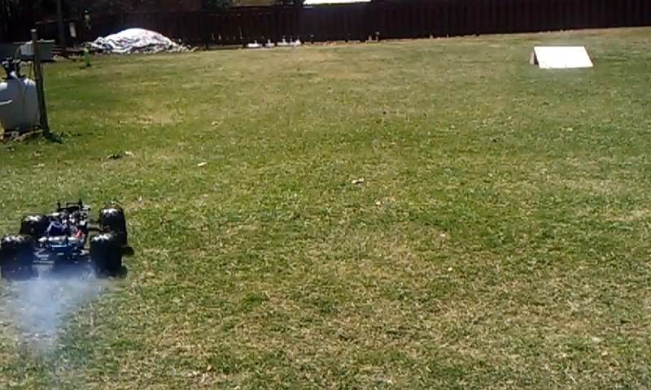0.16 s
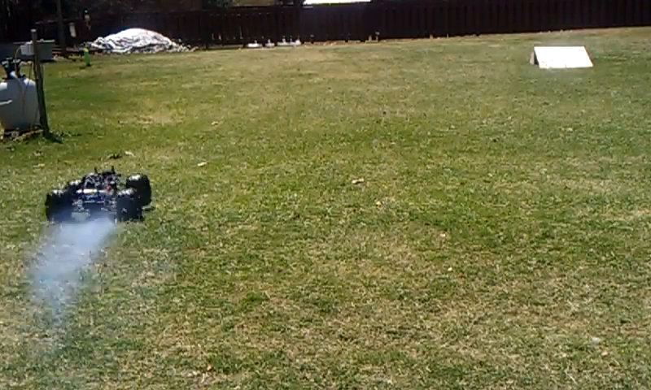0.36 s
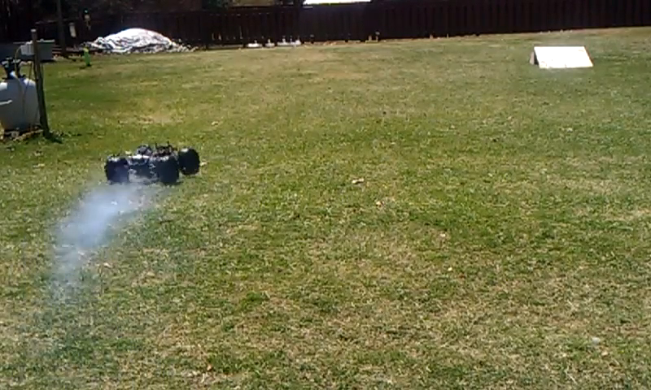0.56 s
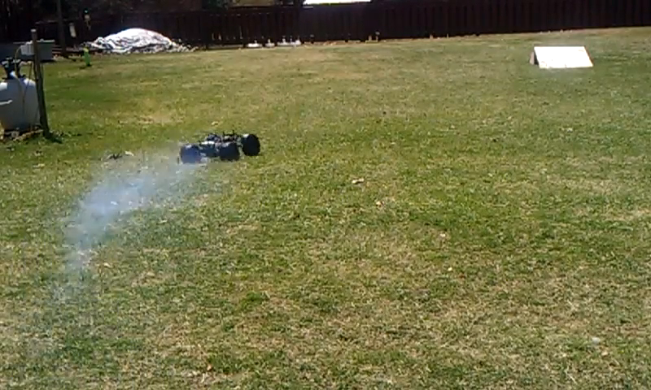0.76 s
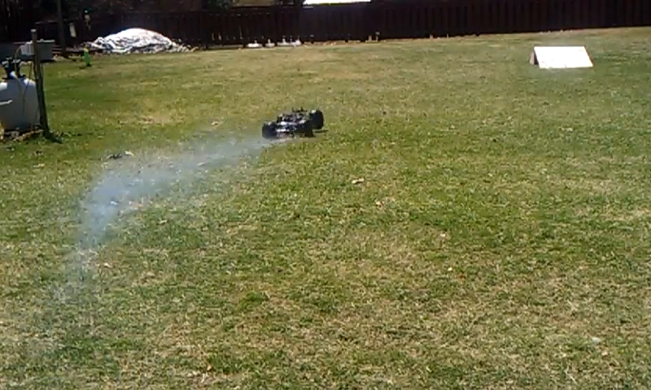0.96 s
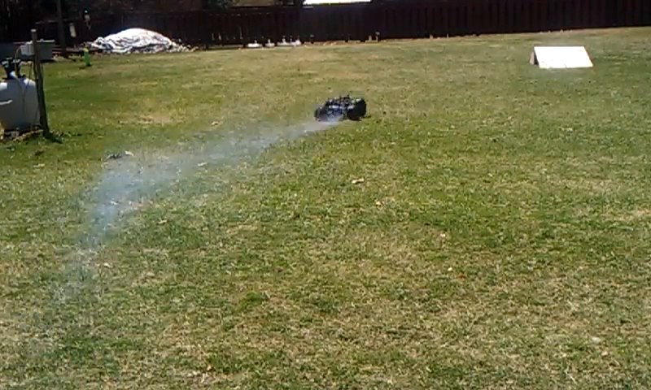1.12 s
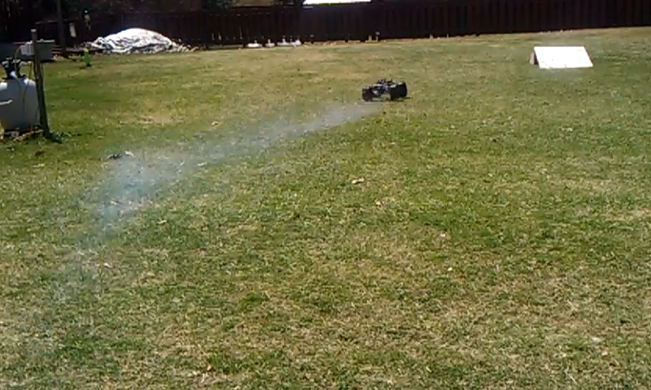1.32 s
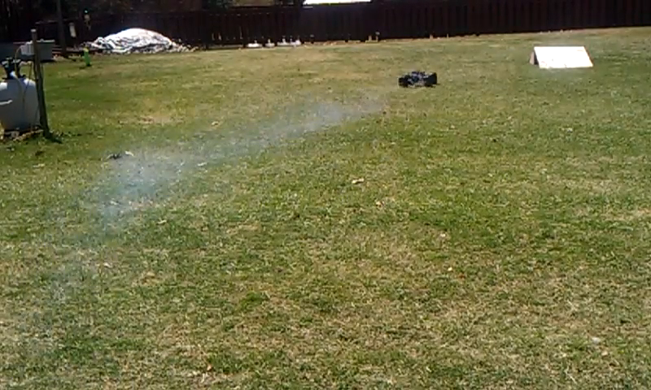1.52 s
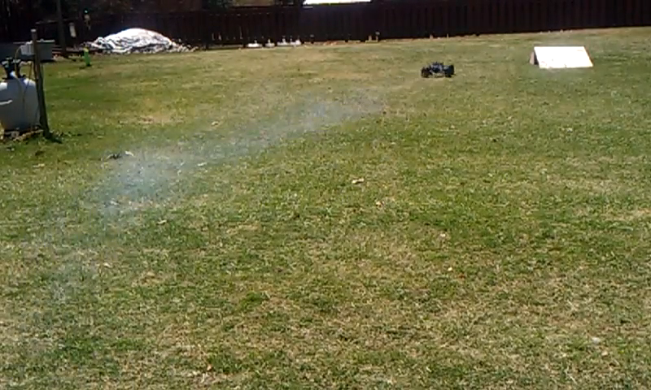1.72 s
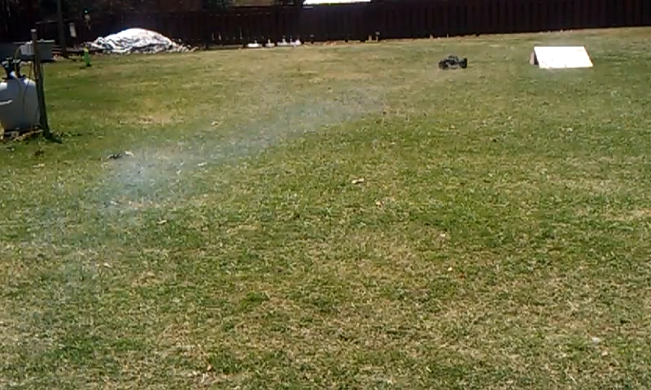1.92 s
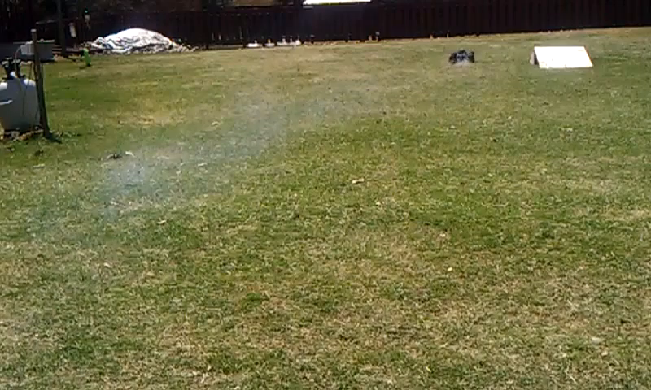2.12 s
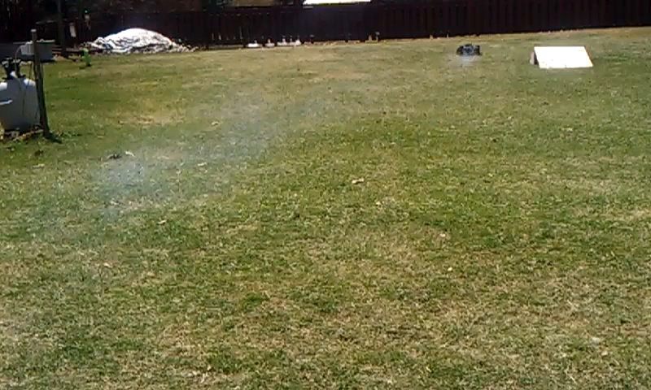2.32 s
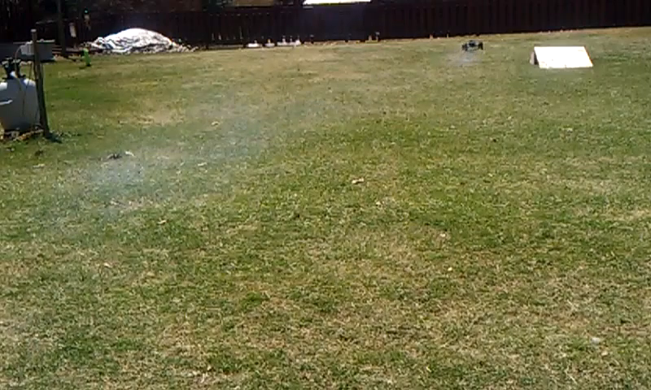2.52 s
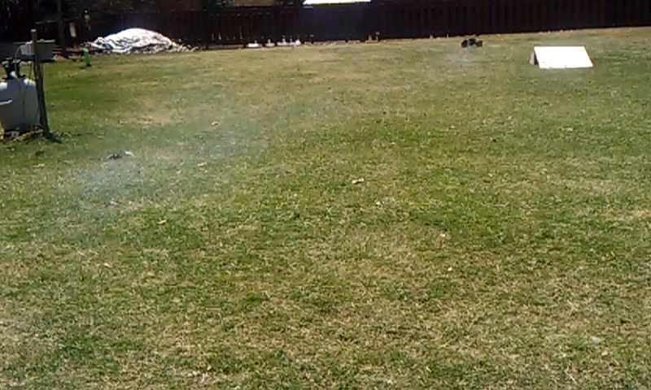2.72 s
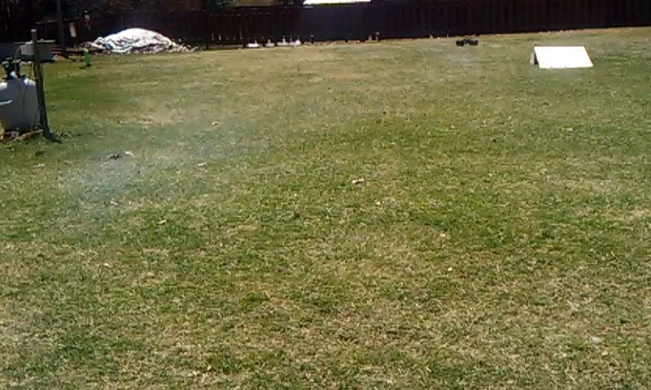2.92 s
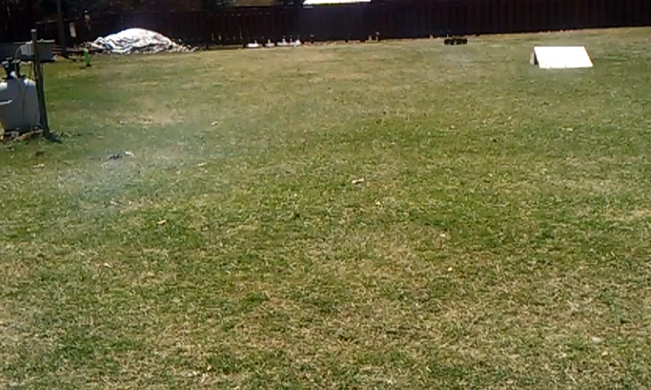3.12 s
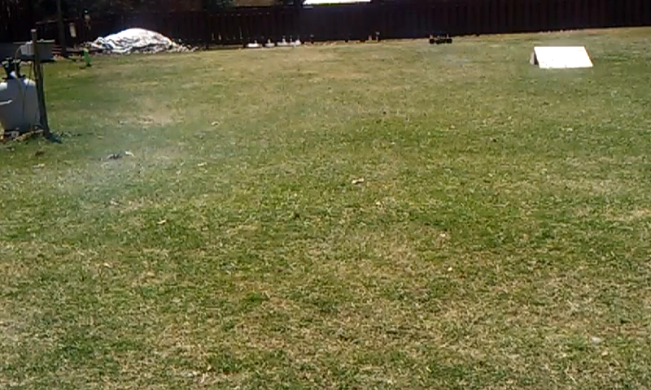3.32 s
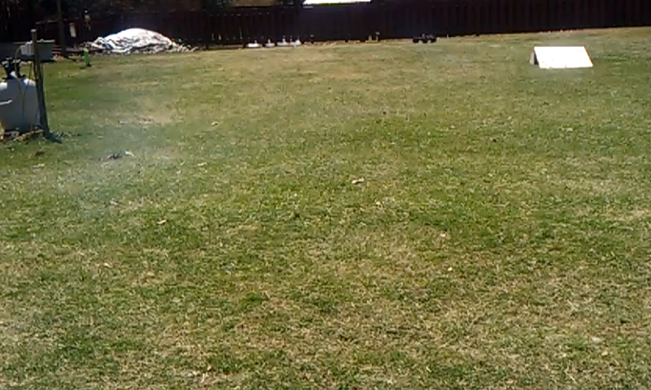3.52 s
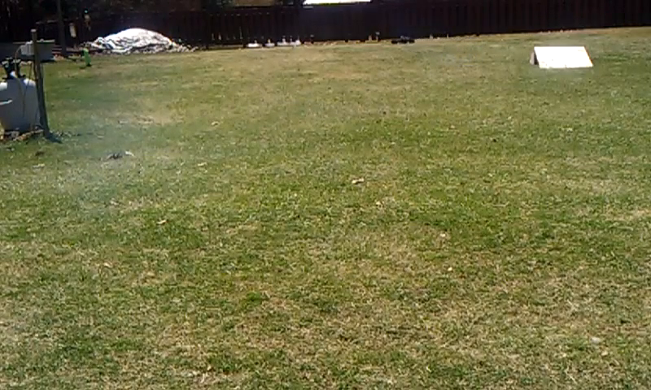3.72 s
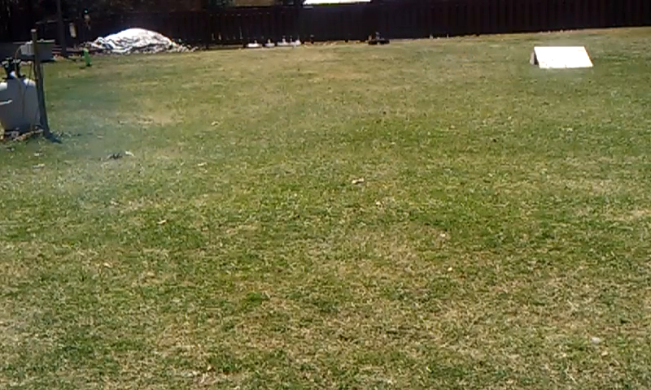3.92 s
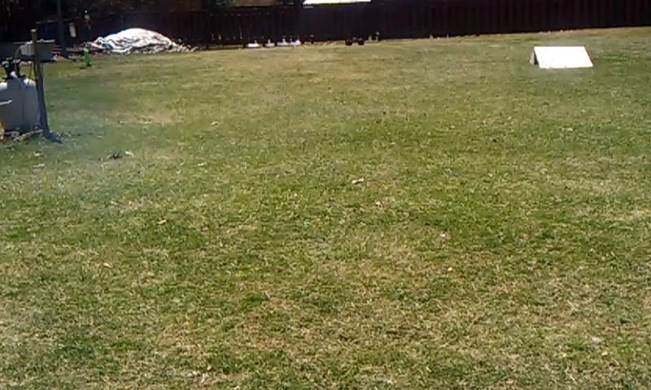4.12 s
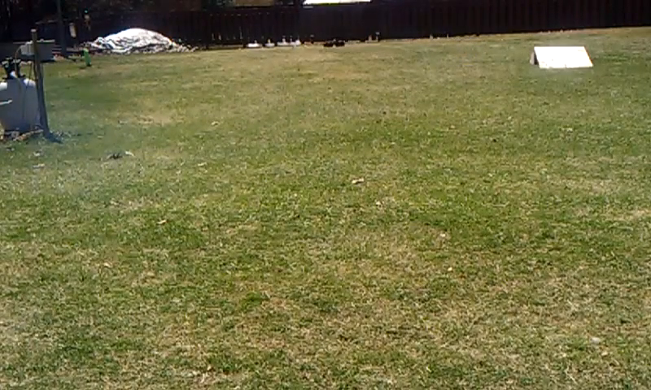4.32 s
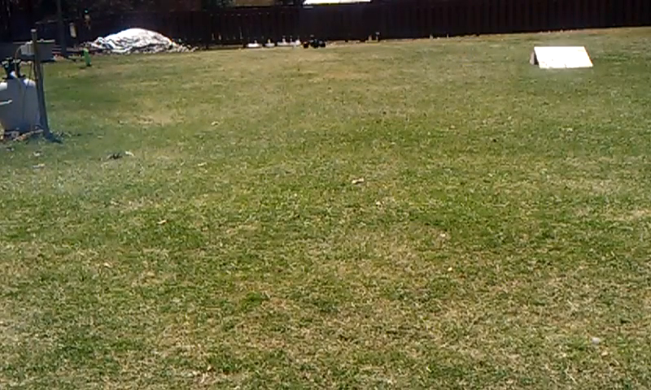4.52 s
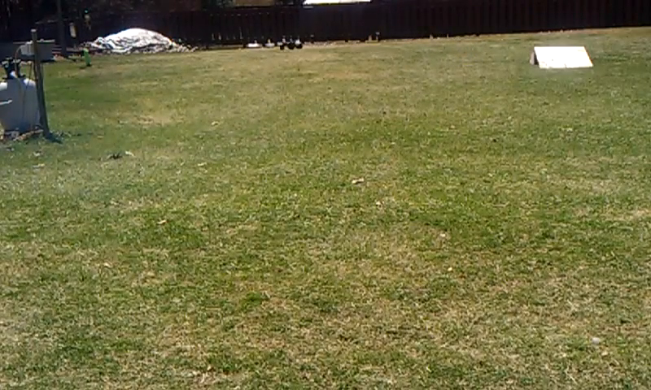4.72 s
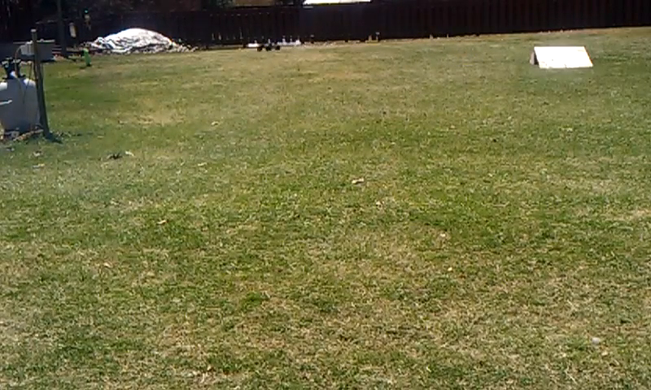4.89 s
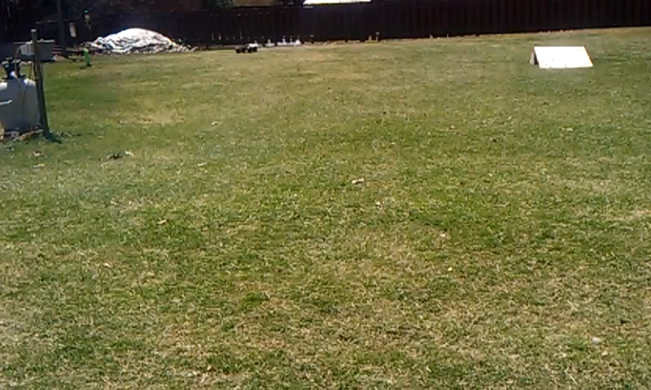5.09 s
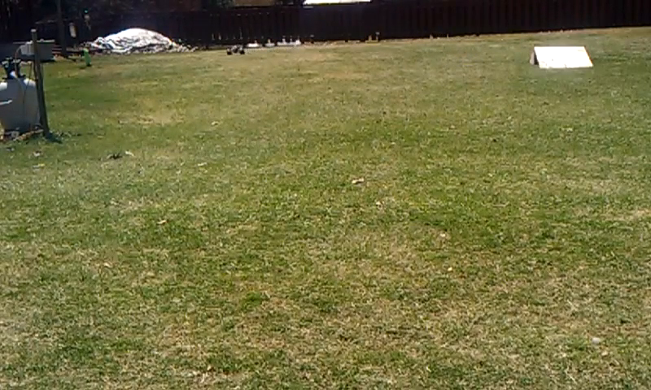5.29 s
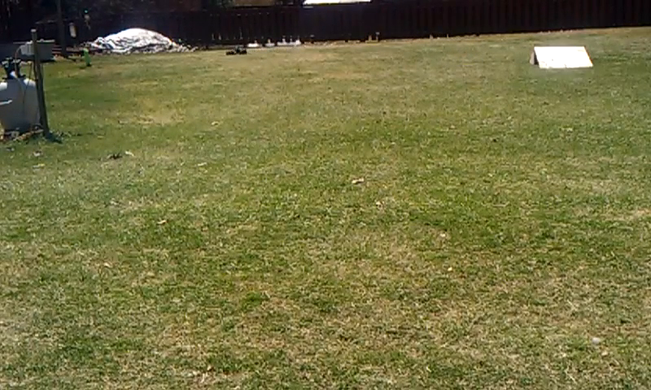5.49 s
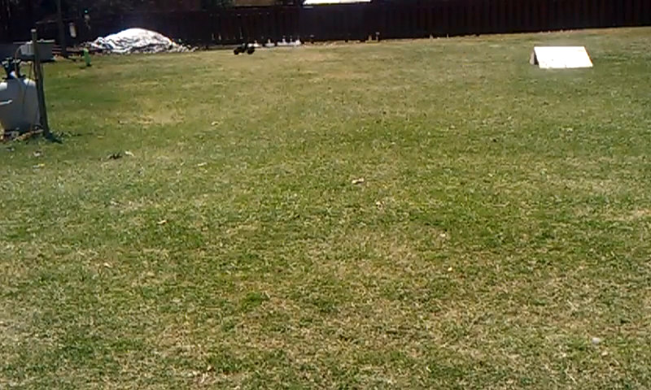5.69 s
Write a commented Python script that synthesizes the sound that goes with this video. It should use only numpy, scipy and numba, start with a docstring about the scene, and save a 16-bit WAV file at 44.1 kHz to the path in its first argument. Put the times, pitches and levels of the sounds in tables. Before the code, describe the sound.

A small two-stroke toy truck engine buzzes loudly away over a lawn in ragged throttle blips, sputters at idle, then revs twice more, faintly.

```python
"""Toy truck with a glow engine

A radio-controlled truck with a small two-stroke engine drives away over a lawn, blips, idles and revs twice more.
Each firing sends a clean pressure pulse and a ragged blast of gas through the tuned pipe; off throttle it sputters.
A fence throws the sound back, more so as the truck gets far.
Soft outdoor air and light wind puffs on the microphone lie behind it."""
import sys
import numpy as np
from scipy import signal
from scipy.fft import rfft, irfft
from scipy.io import wavfile
from scipy.ndimage import uniform_filter1d
from numba import njit

SR = 44100
rng = np.random.default_rng(int(sys.argv[2]) if len(sys.argv) > 2 else 0)


def pcm_store(signal):
    """Save signal as 16-bit PCM."""
    levels = np.round(np.clip(np.atleast_2d(signal), -1, 1) * 32767)
    wavfile.write(sys.argv[1], SR, levels.astype(np.int16).T)


N = 253565
T = np.arange(N) / SR  # time of every sample, s


def engine(metres):
    """Firing tone, low buzz, pipe ring, rasp and idle whine, all locked to the crankshaft."""
    hz, throttle, push_db, pipe_db = drive()
    state = hz, 1 - throttle, push_db, metres
    # the firing rate trembles slightly
    turns = np.cumsum(hz * (1 + .005 * walk(80))) / SR
    pulses = firings(turns, throttle, jitter_s=.000006, idle_jitter_s=.000025,
                     scatter_db=.45, idle_scatter_db=1.3, skip_db=.4)
    pulses = even(pulses)
    rasp = exhaust_rasp(pulses, throttle, state)
    body = pipe_ring(pulses, state) + low_buzz(pulses, state)
    pipe = bounce(rasp + body * undb(pipe_db), spread_s=.0015, share=.6, rate=34)
    tone = firing_tone(turns, throttle, metres)
    return pipe + bounce(tone, spread_s=.0015, share=.35, rate=34)


# pulls on the throttle: (start [s], end [s], firing rate aimed for [Hz], time constant of the change [s],
# opening [0-1], eased off this long before the end [s], level [dB], extra pipe ring and buzz [dB])
THROTTLE_PULLS = [(0, 0.19, 419, 0.42, .92, 0.49, 2.3, 4),
                  (.209, .277, 333, 0.053, 0.79, 0.0068, -1.4, 1.5),
                  (0.276, 0.558, 396, 0.13, 0.76, 0, -2.9, 1),
                  (0.573, 0.739, 448, 0.14, 0.9, 0.0024, -0.7, .5),
                  (0.744, 1.064, 393, .015, 0.82, 0, -1, 1),
                  (1.063, 1.272, 467, 0.041, 0.86, 0.046, 0.3, 2),
                  (1.335, 1.438, 363, .033, 0.26, 0, -0.5, -2),
                  (2.039, 2.318, 474, 0.071, 0.73, 0.067, 1.26, -1.5),
                  (4.369, 4.933, 430, 0.25, 0.72, 0.071, 0.5, -.5),
                  (5.447, 5.794, 416, 0.11, 0.6, 0, -0.65, 4)]
# firing rate aimed for between pulls, sagging as the engine loads up with fuel: (time [s], rate [Hz])
IDLE_RATE = [(3.3, 187.5), (4.3, 183.2), (5.2, 161.1)]
START_HZ, COAST_S = 322, .098  # firing rate of the rolling truck; time constant of the fall toward idle
# throttle at rest (0-1); time constants of its opening and closing
IDLE_OPENING, OPEN_S, CLOSE_S = 0.036, 0.027, 0.063


def drive():
    """Each pull draws the firing rate toward its aim, up or down; between pulls it falls toward idle."""
    aim, = curves(IDLE_RATE)
    resting = (COAST_S, IDLE_OPENING, CLOSE_S, 0, 0)
    lag, opening, servo, push_db, pipe_db = (np.full(N, float(v)) for v in resting)
    for start, end, aim_hz, rise_s, share, ease_s, db, extra_db in THROTTLE_PULLS:
        pulling = (T >= start) & (T < end)
        pressed = (T >= start) & (T < end - ease_s)
        aim[pulling], lag[pulling] = aim_hz, rise_s
        push_db[pulling], pipe_db[pulling] = db, extra_db
        opening[pressed], servo[pressed] = share, OPEN_S
    hz = follow(aim, lag, float(START_HZ))
    # the throttle starts wide open and is already closing during the first pull
    throttle = np.clip(follow(opening, servo, opening.max()), 0, 1)
    return hz, throttle, follow(push_db, servo, 0.), follow(pipe_db, servo, 0.)


def firings(turns, throttle, jitter_s, idle_jitter_s, scatter_db, idle_scatter_db, skip_db):
    """One pulse a turn; a starved engine fires at less regular times and strengths, and turns alternate in strength."""
    at = np.interp(np.arange(1, int(turns[-1])), turns, np.arange(N))
    index = at.astype(int)
    starved = 1 - throttle[index]
    late, strong = np.clip(rng.standard_normal((len(at), 2)), -2, 2).T
    alternate = (-1) ** np.arange(len(at)) * walk(10)[index]
    sizes = undb(strong * (scatter_db + idle_scatter_db * starved) + skip_db * alternate)
    delay_s = late * (jitter_s + idle_jitter_s * starved)
    return clicks(at + SR * delay_s, sizes)


def gas(pulses, decay_s):
    """A burst of turbulence follows every pulse and dies away."""
    push = signal.lfilter([1], [1, -np.exp(-1 / (decay_s * SR))], pulses)
    return even(push * rng.standard_normal(N))


# colour of the rasp on throttle: (frequency [Hz], relative level [dB])
RASP_COLOUR = [(600, -59), (1500, -57.5), (2500, -50.5), (3000, -11.5), (3450, -9), (4100, -10.5),
               (5100, -12), (5900, 1.5), (6450, 2.5), (7400, -16), (8400, -9.5), (9600, -21), (10900, -9.5),
               (13000, -30.5), (16300, -17.5)]
# colour of the sputter off throttle: (frequency [Hz], relative level [dB])
SPUTTER_COLOUR = [(400, -38), (1000, -63), (2000, -17), (3400, -4.5), (4500, 0), (5350, -2), (5900, 5.5),
                  (6500, 5), (7400, -3), (8200, -6.5), (8900, -13), (10000, -16), (11400, -19.5),
                  (17000, -22)]
# thin metallic ring that the idling engine sets off: (frequency [Hz], width [Hz], relative level [dB])
WHINE_RINGS = [(5390, 81, -2), (5780, 150, -7), (9940, 29, -4)]
# strength of that ring against the exhaust, before the throttle fades it: (time [s], level [dB])
WHINE_LEVEL = [(1.4, -18), (1.75, -3), (2.0, 1.5), (2.4, -19), (2.8, 1.5), (3.3, -6), (3.7, -11),
               (5.75, -5)]


def exhaust_rasp(pulses, throttle, state):
    """An open throttle blasts through the pipe; a shut one only sputters and sets off a metallic whine."""
    shut = 1 - throttle
    blast = even(pulses + undb(-6) * gas(pulses, decay_s=.0016))
    puffs = even(pulses + undb(1) * gas(pulses, decay_s=.004))
    roar = throttle ** 2 * unit(colour(blast, RASP_COLOUR))
    sputter = shut * unit(colour(puffs, SPUTTER_COLOUR))
    whine = even(resonate(puffs, WHINE_RINGS)) * undb(curves(WHINE_LEVEL)[0]) * shut
    gain = loudness(state, db=0.91, slow_db=-14.0, shut_db=-9.5, far_db=-20.5)
    return even(even(roar + sputter) + whine) * gain


# colour of the pipe's first ring: (frequency [Hz], relative level [dB])
RING_COLOUR = [(1500, -38.5), (2250, -40.5), (2600, -7.5), (2850, 0.5), (3100, -2.5), (3400, -6.5),
               (3900, -8), (4700, -4), (7000, -52)]


def pipe_ring(pulses, state):
    """Every firing pulse makes the pipe ring."""
    gain = loudness(state, db=-8.5, slow_db=-17.5, shut_db=-15, far_db=-22.0)
    return even(colour(pulses, RING_COLOUR)) * gain


# colour of the low buzz: (frequency [Hz], relative level [dB])
BUZZ_COLOUR = [(450, -50.5), (620, -8.5), (800, -3), (990, -8), (1170, 1), (1340, -1.5), (1550, -1.5),
               (1750, 3), (2050, 3.5), (2350, 0.5), (2700, -14.5), (4000, -36)]


def low_buzz(pulses, state):
    """The same pulses, filtered lower, make a buzz."""
    gain = loudness(state, db=-14.5, slow_db=-7.5, shut_db=-9.5, far_db=-27)
    return even(colour(pulses, BUZZ_COLOUR)) * gain


# the pipe is loudest at this firing rate and falls off above it
TUNED_HZ, OVERREV_DB_PER_OCTAVE = 365.8, -6


def loudness(state, db, slow_db, shut_db, far_db):
    """Layer gain: db at 1 m, slow_db per octave below tuning, shut_db off throttle, far_db per tenfold distance."""
    hz, shut, push_db, metres = state
    octaves = np.log2(hz / TUNED_HZ)
    below_db = slow_db * np.maximum(-octaves, 0)
    above_db = OVERREV_DB_PER_OCTAVE * np.maximum(octaves, 0)
    return undb(db + push_db + below_db + above_db + shut_db * shut + far_db * np.log10(metres))


# level of the firing tone, before it wavers: (time [s], level [dB])
TONE_LEVEL = [(0, -28), (.45, -31.5), (.7, -39.5), (1.0, -43.5), (1.15, -39), (1.38, -45), (1.6, -60),
              (2.0, -55.5), (2.1, -43.5), (2.27, -49), (2.5, -57), (3.2, -60.5), (3.9, -55.5), (4.4, -59.5),
              (4.7, -53), (5.0, -64.5), (5.3, -69), (5.55, -56)]
# second harmonic against the firing tone at full throttle: (distance [m], level [dB])
OCTAVE_LEVEL = [(10, -19), (17, 1), (25, -5)]
WAVER_DB, WAVER_DB_PER_M = 1.43, 0.1758  # unsteadiness of the tone; under throttle it grows with distance


def firing_tone(turns, throttle, metres):
    """Gas leaves the outlet once a turn; uneven burning adds a faint half-speed throb."""
    angle = 2 * np.pi * turns
    waver_db = (WAVER_DB + WAVER_DB_PER_M * metres * throttle) * walk(70)
    octave_gain = undb(np.interp(metres, *np.transpose(OCTAVE_LEVEL)))
    octave = octave_gain * throttle * np.sin(2 * angle)
    throb = undb(-29.5) * walk(42) * np.sin(angle / 2)
    level = undb(curves(TONE_LEVEL)[0] + waver_db)
    return np.sqrt(2) * (np.sin(angle) + octave + throb) * level


def bounce(x, spread_s, share, rate, count=6):
    """Paths via ground, wheels and frame come and go as the truck bounces: each harmonic flutters by itself."""
    paths = 0
    for _ in range(count):
        flutter = np.roll(walk(rate), rng.integers(N))
        paths = paths + smear(x, 2 * spread_s) * flutter
    paths = paths / np.sqrt(count)
    return (smear(x, spread_s) + share * paths) / np.sqrt(1 + share ** 2)


def smear(x, spread_s, size=2048):
    """A cluster of close reflections spreads each pulse in time without changing its colour."""
    response = rfft(rng.standard_normal(size) * np.exp(-np.arange(size) / (spread_s * SR)))
    cluster = np.roll(irfft(response / np.abs(response)), size // 8)
    return signal.fftconvolve(x, cluster)[size // 8:][:N]


# echo gain at 1 m, before the fence's colour; its growth per tenfold distance
FENCE_DB, FENCE_DB_PER_DECADE = -22.5, 11.5


def yard(x, metres, fence_s, t60_s, scatter_db):
    """The fence returns one slap and a short scatter; grass and boards keep little of the bass."""
    t = T[:SR // 2]
    fade = undb(-60 * t / t60_s) * (1 - np.exp(-t / 0.0043))
    scatter = unit(rng.standard_normal(len(t)) * fade) / np.sqrt(len(t))
    slap = np.interp(T - fence_s, T, x, left=0)
    echo = slap + undb(scatter_db) * signal.fftconvolve(x, scatter)[:N]
    back = colour(echo, [(200, -9), (700, 1.5), (2500, 6), (6500, 1), (15000, -9)])
    share = undb(FENCE_DB + FENCE_DB_PER_DECADE * np.log10(metres))
    return (x + share * back) / np.sqrt(1 + share ** 2 / 2)


# colour of the outdoor air: (frequency [Hz], relative level per Hz [dB])
AIR_COLOUR = [(30, -9), (130, -3.5), (260, -6.5), (430, -9.5), (800, -5), (1200, -2.5), (3000, -10.5),
              (6000, -7), (10000, -23), (17000, -41)]


def distant_air():
    """Soft filtered noise, drifting slowly in level."""
    return unit(colour(rng.standard_normal(N), AIR_COLOUR)) * undb(-52.5 + 1.6 * walk(2.91))


# wind puffs on the microphone: (time of peak [s], level [dB], length as bell-curve spread [s])
WIND_PUFFS = [(.36, -52, 0.067), (0.568, -49, 0.049), (0.88, -46, 0.021), (1.15, -67, 0.043),
              (1.51, -55, 0.042), (2.027, -37.5, 0.013), (2.659, -52.5, 0.021), (2.99, -54.5, 0.029)]


def wind():
    """Wind rumbles on the microphone: low noise under unsteady eddies and single puffs."""
    outline = [(20, -13), (45, -2.5), (170, -9), (300, -25.5), (900, -37), (3000, -73)]
    rumble = unit(colour(rng.standard_normal(N), outline))
    eddies_db = 5 * np.tanh(walk(12))
    gusts = undb(-68.5 + eddies_db)
    for peak_s, db, length_s in WIND_PUFFS:
        gusts = gusts + undb(db) * np.exp(-.5 * ((T - peak_s) / length_s) ** 2)
    return rumble * gusts


def undb(db):
    """Decibels to gain."""
    return 10 ** (np.asarray(db) / 20)


def curves(table):
    """Each column of a table joined by straight lines in time."""
    s, *columns = np.transpose(table)
    return [np.interp(T, s, c) for c in columns]


def unit(x):
    """Scale to rms 1."""
    return x / np.sqrt(np.mean(x ** 2))


def even(x, size=3500):
    """Hold the short-term rms at 1, over a window of size samples."""
    return x / np.sqrt(np.abs(uniform_filter1d(x ** 2, size)) + 1e-12)


def colour(x, points, size=4096):
    """Causal filter with the given (Hz, dB) outline, so that pulses ring after they strike."""
    hz, db = np.transpose(points)
    f = np.maximum(np.fft.rfftfreq(size, 1 / SR), 1)
    gain = undb(np.interp(np.log(f), np.log(hz), db))
    # folding the cepstrum gives minimum phase: nothing sounds before the pulse
    cepstrum = irfft(np.log(gain))
    cepstrum[1:size // 2] *= 2
    cepstrum[size // 2 + 1:] = 0
    return signal.fftconvolve(x, irfft(np.exp(rfft(cepstrum))))[:N]


def walk(rate):
    """Smooth chance with spread 1, drawn anew rate times a second."""
    k = int(SR / rate)
    steps = np.repeat(rng.standard_normal(N // k + 1), k)
    return unit(uniform_filter1d(steps, k)[:N])


def clicks(at, sizes, order=6):
    """Band-limited pulses at fractional sample positions."""
    index = at.astype(int)[:, None] + np.arange(1 - order, order + 1)
    offset = index - at[:, None]
    shape = np.sinc(offset) * np.sinc(offset / order) * sizes[:, None]
    return np.bincount(np.clip(index, 0, N).ravel(), shape.ravel(), N + 1)[:N]


def resonate(x, modes):
    """Narrow resonances in parallel, each ringing at its own pitch."""
    rings = 0
    for hz, width, db in modes:
        rings = rings + undb(db) * signal.lfilter(*signal.iirpeak(hz, hz / width, SR), x)
    return unit(rings)


@njit
def follow(aim, lag_s, start):
    """A quantity that closes in on its aim with the given time constant."""
    out, value = np.empty(len(aim)), start
    for i in range(len(aim)):
        value += (aim[i] - value) / (1 + lag_s[i] * SR)
        out[i] = value
    return out


# distance of the truck from the microphone: (time [s], distance [m])
TRUCK_DISTANCE = [(0, 1.83), (.41, 2.42), (.55, 3.16), (.9, 5), (1.3, 6.76), (2.15, 7.17), (2.35, 10.9),
                  (2.7, 13.9), (3.3, 25), (4.2, 21.8), (4.7, 18.6), (5.05, 30.4), (5.75, 21)]


def scene():
    """The truck in the yard, with air and wind behind it."""
    metres, = curves(TRUCK_DISTANCE)
    truck = yard(engine(metres), metres, fence_s=.075, t60_s=.42, scatter_db=6.5)
    return (truck + distant_air() + wind())[None]


TOP_HZ = 18300  # highest frequency kept


def record(dry):
    """Round the highest peaks, then cut the top of the treble steeply."""
    rounded = dry / (1 + dry ** 10) ** (1 / 10)
    return signal.sosfilt(signal.ellip(12, .2, 85, TOP_HZ, fs=SR, output="sos"), rounded)


dry = scene()
out = record(dry)
pcm_store(out)
```